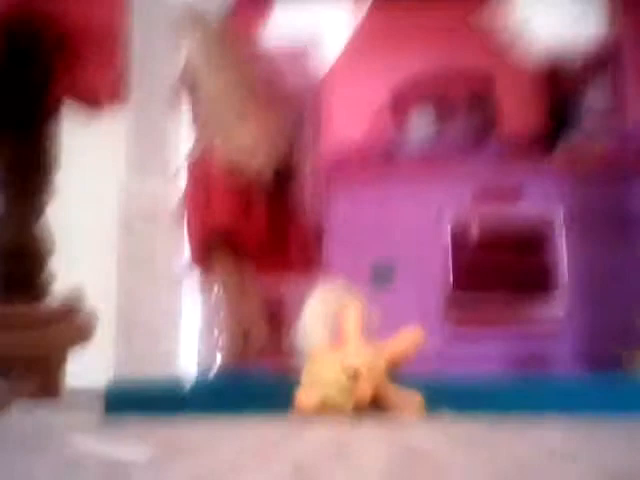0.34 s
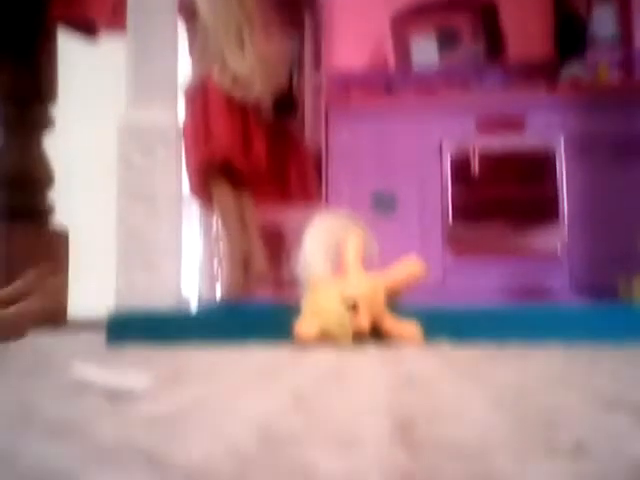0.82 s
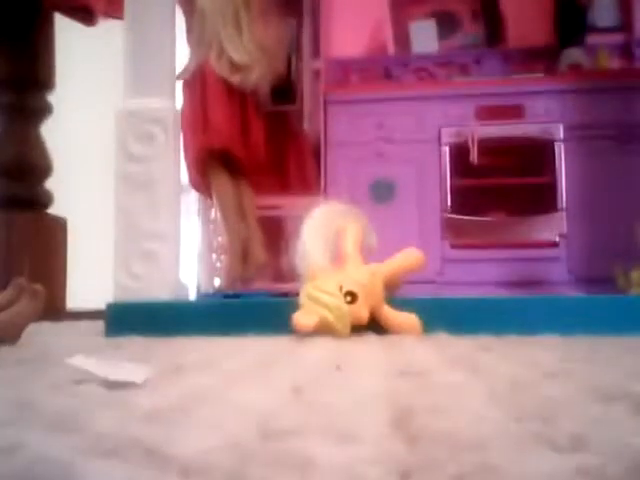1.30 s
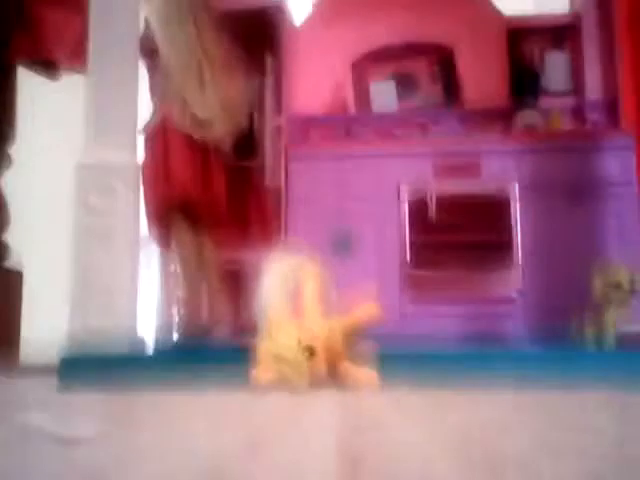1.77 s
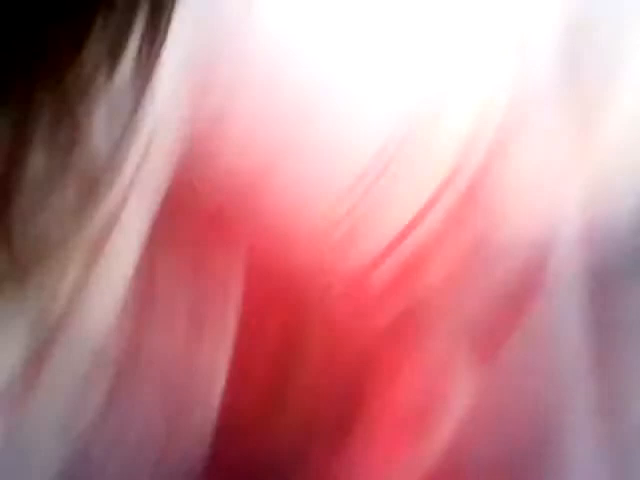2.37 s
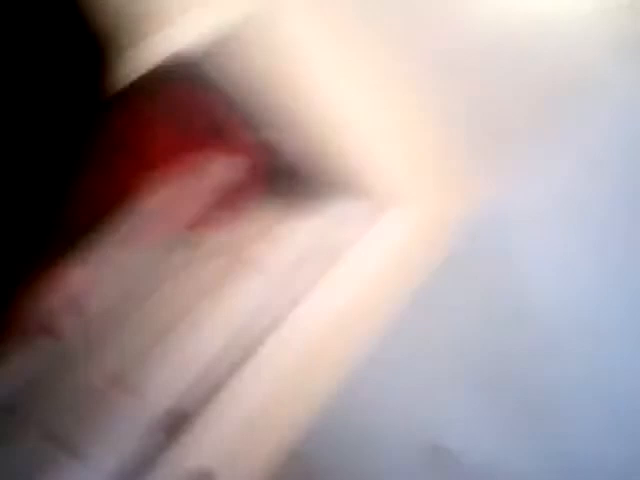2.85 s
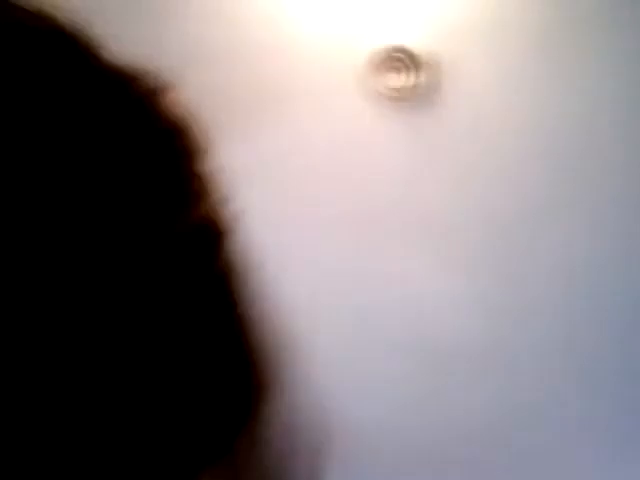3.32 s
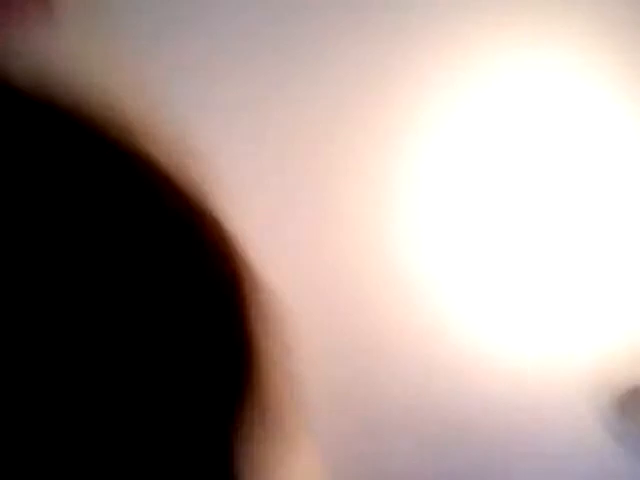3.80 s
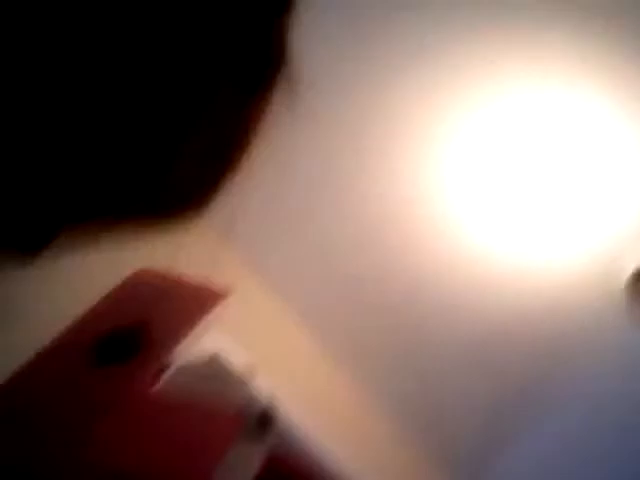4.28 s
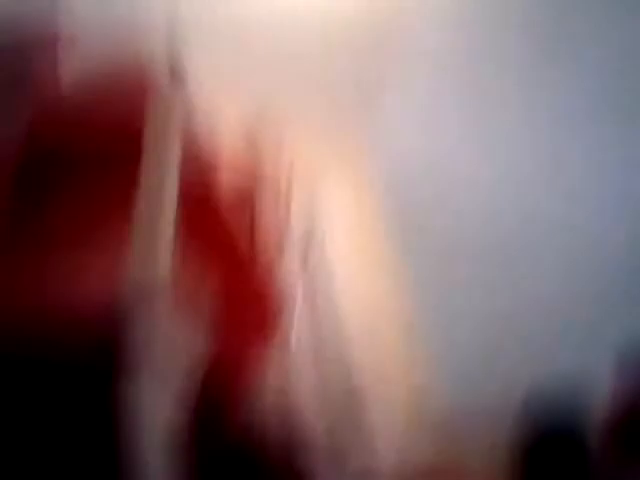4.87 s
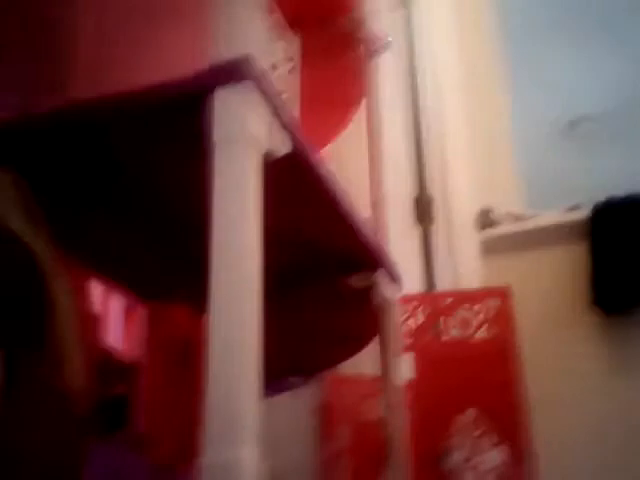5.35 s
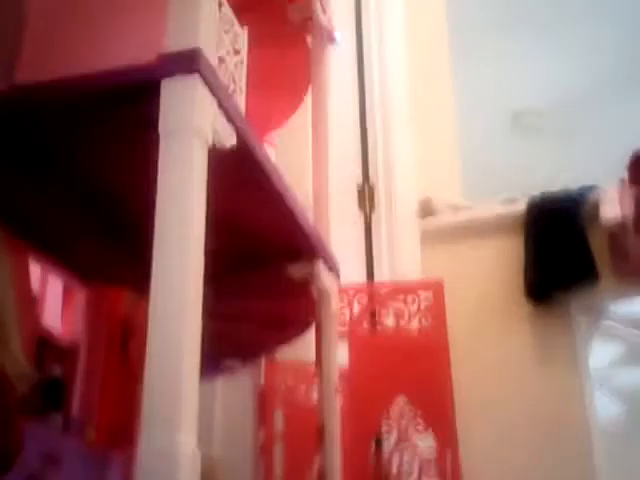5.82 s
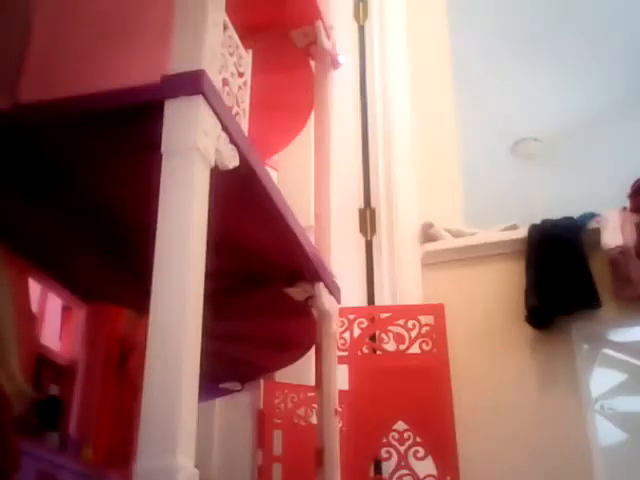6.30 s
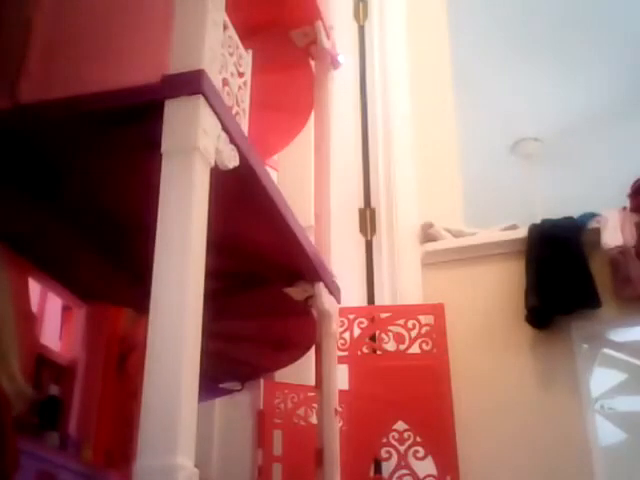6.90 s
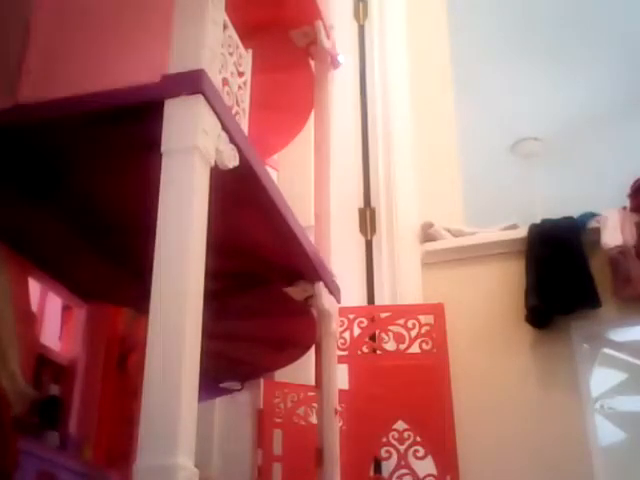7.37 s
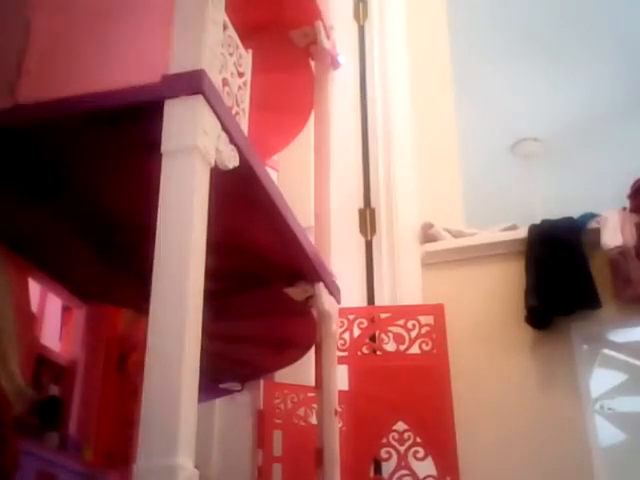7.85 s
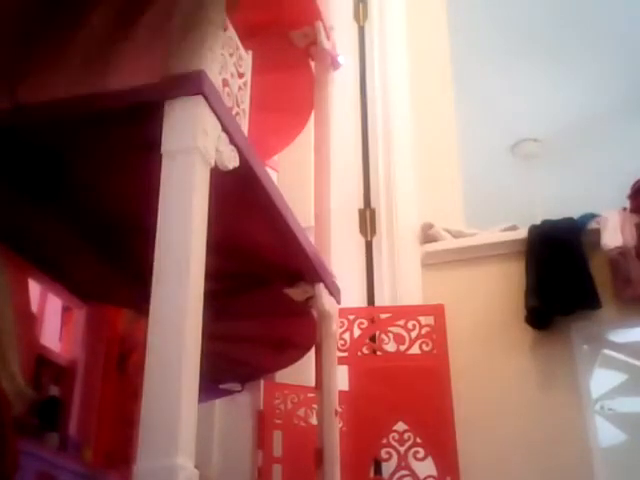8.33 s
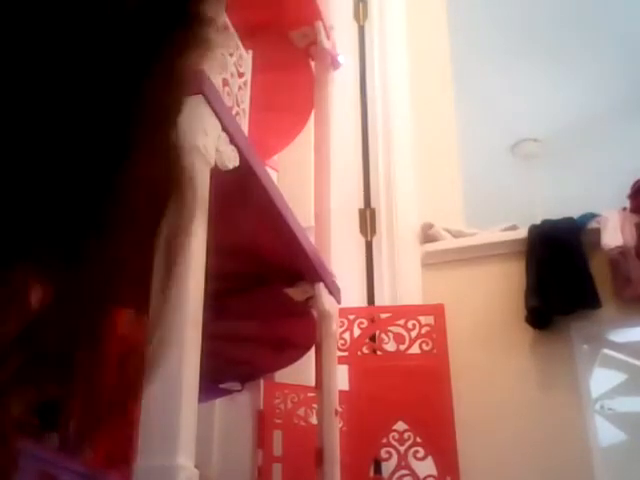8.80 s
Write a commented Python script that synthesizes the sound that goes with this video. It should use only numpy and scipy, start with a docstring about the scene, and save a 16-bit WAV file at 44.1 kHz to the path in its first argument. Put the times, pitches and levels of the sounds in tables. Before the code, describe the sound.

A small plastic camera is handled in a quiet bedroom, heard through its own case. Short hollow rubs come first, then a pause, then a cluster of knocks with a distorted bang at about two seconds. Uneven rubbing and light clicks follow, another harsh crack near six seconds, then mostly faint hiss with a few soft taps and brushes.

```python
"""Fingers and cloth drag over the plastic case of a small camera in a bedroom, right at its microphone:
stick-slip noise shaped into drag, scrape and hiss, plus resonant noises for the air pocket and skin swish.
Knocks thud (damped sines), ring the case modes and crack (noise bursts); the hardest overload the input.
The flexing case rumbles. A weak room tail, rumble, hiss and a thin whine lie underneath.
"""
import sys
import numpy as np
from scipy import signal
from scipy.fft import rfft, irfft, next_fast_len
from scipy.io import wavfile
from scipy.ndimage import map_coordinates

SR = 44100
rng = np.random.default_rng(int(sys.argv[2]) if len(sys.argv) > 2 else 0)


def dump_mix(stems):
    """Bounce the given channels to the path in sys.argv[1] as a 16-bit WAV at rate SR."""
    frames = np.atleast_2d(stems).T  # one column per channel
    limited = np.clip(frames, -1, 1)  # hard clip at full scale
    pcm = np.round(limited * 32767).astype(np.int16)
    wavfile.write(sys.argv[1], SR, pcm)


N = 402182
TIME = np.arange(N) / SR

# noise spectra, shape only: [f/Hz, relative density/dB]
FLOOR_SPECTRUM = [(15, -42.5), (25, -9), (91, 0), (151, -8), (482, -21.5), (1710, -30), (2980, -30),
                  (5770, -40.5), (6940, -31.5), (8580, -38), (10900, -32.5), (12700, -35.5), (13800, -21)]
RUMBLE_SPECTRUM = [(20, -5.5), (40, 1), (70, 5.5), (100, 3), (150, -6), (300, -43)]
CRACK_SPECTRUM = [(400, -11), (800, 9), (1300, 5), (2000, 5), (3000, 1.5), (4200, -3), (7000, -10.5),
                  (10000, -16), (14000, -13.5)]
DRAG_SPECTRUM = [(60, -11.5), (110, -4.5), (170, 0.5), (240, -1.5), (350, -5.5), (500, -3), (700, -17.5),
                 (1000, -37), (1800, -51.5)]
SCRAPE_SPECTRUM = [(400, -23), (750, 5), (1100, 2), (1600, -2), (2200, -3), (3000, -3), (3700, -10.5),
                   (4800, -16), (7000, -28)]
HISS_SPECTRUM = [(2500, -4.5), (4200, 2), (5200, 2), (6500, -0.5), (8500, -4.5), (11000, -2), (13700, -4.5),
                 (16000, -18)]
# case flexing under a firm grip: [t/s, rumble level/dB]
FLEX = [(0, -38), (.35, -56.5), (1.4, -46.5), (1.95, -50), (2.14, -34), (2.6, -55), (3.4, -53), (4, -49.5),
        (4.7, -51.5), (5.9, -45), (7.3, -57), (8.22, -43), (8.9, -46)]
# knocks and taps: [t/s, thud peak/dB, thud f/Hz, case ring level/dB, crack level/dB]
KNOCKS = [(0.0738, -28, 554, -42, -20), (0.086, -12.5, 420, -20.5, -3.5), (.14, -40, 420, -46, -16.5),
          (.181, -17.5, 135, -26, -48), (0.9173, -36, 180, -53, -27.5), (1.4922, -13, 102, -43, -27.5),
          (1.531, -7, 154, -18, -13), (1.585, -12, 93, -19.5, -9.5), (1.798, -17, 364, -29, -15),
          (1.847, -22, 221, -50, -44.5), (1.8939, -17.5, 193, -27.5, -20.5), (2.067, 6.5, 348, -4, 6.5),
          (2.1716, -25, 418, -33.5, -28), (2.2376, -19.5, 172, -32.5, -29.5),
          (2.3843, -4.5, 493.4, -16.5, -30), (2.4712, -19.5, 192, -36, -18), (2.626, -40, 205, -38, -19),
          (2.631, -38, 409, -37, -17), (2.674, -32, 420, -30.5, -21.5), (2.839, -15.5, 206, -50, -18.5),
          (3.1859, -25, 436, -27, -26), (3.261, -19, 431, -26.5, -21), (3.3136, -13, 330, -22, -16),
          (3.472, -47, 446, -31, -28), (3.6, -29, 395, -43, -42), (3.6772, -54, 253, -33, -29),
          (3.776, -26.5, 192, -31, -18), (4.034, -28.5, 179, -36, -24.5), (4.2912, -35.5, 528, -46, -28.5),
          (4.7687, -30.5, 374, -53.5, -34), (5.0093, -15.5, 221, -25, -13), (5.036, -20, 366, -35, -17),
          (5.067, -21.5, 94, -21, -17.5), (5.0798, -23, 172, -42, -16.5), (5.4347, -19, 193, -31, -19.5),
          (5.5661, -18.5, 157, -38.5, -13), (5.61, -16, 383, -31, -24), (5.621, -15, 227, -19.5, -13.5),
          (5.6422, -16, 650, -24.5, 4), (5.7282, 5, 176.3, 1.5, 12), (5.757, -11, 62, -18, -38),
          (5.895, -21.5, 174.2, -37, -25.5), (6.233, -33.5, 818, -51, -32),
          (8.1684, -17.5, 370, -37, -15.5), (8.4187, -32.5, 926, -44, -36.5)]
# one hop of a juddering fingertip: [thud peak/dB, thud f/Hz, case ring level/dB, crack level/dB]
HOP = (-18.5, 184, -44.5, -25)
# case modes, before detuning: [f/Hz, relative level/dB, t60/s]
CASE_MODES = [(202, -0.5, 0.039), (269, -0.5, 0.097), (381.6, 5, 0.054), (458, 3.5, 0.051),
              (588, -0.5, 0.075), (680, 3.5, 0.039), (783, 0, 0.045), (924, -3, 0.045), (1190, -1, 0.042),
              (1460, -7, .04)]
# air pocket between hand and microphone port: [t/s, lower resonance f/Hz, upper resonance f/Hz]
POCKET = [(.22, 430, 1700), (.38, 490, 1328), (.56, 510, 1426), (.72, 570, 1360), (.92, 630, 1120),
          (2.6, 540, 1106), (3.08, 270, 1400), (3.3, 430, 1080), (3.5, 480, 954.6), (3.8, 620, 1090),
          (4.4, 660, 1389), (8, 440, 860)]
# narrow swish of bare skin on smooth plastic: [t/s, centre f/Hz, level relative to scrape/dB]
SWISH = [(.13, 2250, 0.5), (.33, 2928, -1), (.46, 3110, -6), (.65, 2675, -9), (.9, 3150, -8),
         (1.55, 2980, -17), (2.05, 2900, 1), (2.4, 2990, -12), (2.55, 2952, 1), (2.68, 3062, -26),
         (3.3, 2900, -41), (3.6, 3220, -9.5), (4.5, 2922, -15.5), (5.55, 3000, -2.5), (5.88, 3100, -8.5),
         (6.02, 3400, -0.5), (7.2, 3661, -16)]
# strokes of fingers and cloth, levels at mid-stroke:
# [full contact t/s, length/s, drag level/dB, scrape level/dB, hiss level/dB, swell start to end/dB]
STROKES = [(0, 0.18, -35.5, -37.5, -52, 8), (0.194, 0.087, -27.5, -31, -42.5, 6.5),
           (0.301, 0.11, -27, -35.5, -51, -5), (0.408, 0.19, -26, -38, -53, 7),
           (0.608, 0.099, -33.5, -38.5, -63, -11), (0.717, 0.21, -33, -42, -57.5, -1),
           (1.01, 0.018, -60, -72, -72, -2), (1.393, 0.043, -39.5, -54, -62, -3),
           (1.493, 0.033, -44, -53, -49, -20), (1.556, 0.011, -36, -21, -41, 0.5),
           (1.602, .11, -43.5, -39.5, -43.5, -11), (1.739, 0.11, -41.5, -43.5, -46, -1),
           (1.895, 0.16, -40, -36, -40.5, 13), (2.072, 0.1, -39, -37.5, -37.5, -16.5),
           (2.232, 0.021, -50, -51, -57, -5), (2.324, .04, -52.5, -64.5, -67, 0),
           (2.396, 0.053, -33.5, -47, -59.5, -5), (2.496, 0.088, -45, -45.5, -55, 5.5),
           (2.645, 0.15, -34, -41.5, -51.5, 5), (2.812, 0.24, -34, -47.5, -55.5, -4),
           (3.033, 0.21, -31, -38, -52, 0), (3.264, 0.082, -25.5, -35, -59, -3),
           (3.372, 0.064, -39.5, -42, -54, 2), (3.475, 0.086, -35.5, -38.5, -58.5, -10),
           (3.609, 0.088, -41, -47.5, -59, -2.5), (3.753, 0.092, -42, -49.5, -56, 2.5),
           (3.906, 0.052, -39.5, -44.5, -53.5, 14), (3.972, 0.093, -44, -52.5, -61, 8),
           (4.299, 0.041, -43, -49, -61, -8.5), (4.36, 0.11, -50, -60, -71, 19),
           (4.545, 0.07, -45, -55, -61.5, -13), (4.779, 0.013, -47.5, -56, -57.5, 10),
           (4.898, 0.089, -47.5, -48.5, -57, 3), (5.017, 0.055, -33, -43, -44.5, 5.5),
           (5.266, 0.14, -45.5, -47, -46.5, 1.5), (5.422, 0.037, -34.5, -42, -45, -3),
           (5.469, 0.17, -40.5, -37.5, -39.5, 5), (5.651, .07, -41, -39.5, -36.5, -1),
           (5.76, 0.047, -35.5, -49, -58.5, 2), (5.847, 0.16, -41.5, -41, -48, 12),
           (6.025, 0.024, -50, -54, -59.5, 2.5), (7.192, 0.036, -45, -50.5, -58.5, 0.5),
           (7.602, 0.057, -45.5, -50.5, -58.5, -2), (7.877, .06, -44, -49, -56.5, 3.5),
           (8, 0.034, -46, -52.5, -56.5, -4), (8.122, 0.034, -47, -53, -62, 6),
           (8.169, 0.14, -43.5, -52.5, -59, -4.5), (8.434, 0.018, -47, -54.5, -57.5, -1.5),
           (8.633, 0.19, -44, -49.5, -63.5, 1), (8.851, 0.054, -42.5, -53, -63.5, -2)]
# hand hovering, barely touching: [t/s, drag level/dB]
HOVER = [(3.8, -81), (4.1, -67.5), (4.7, -68.5), (5.1, -88), (6.8, -84.5), (7.15, -66), (7.4, -66),
         (8.1, -61), (8.55, -66), (9.1, -67.5)]

FLOOR_DB, WHINE_HZ, WHINE_DB = -63, 10560, -87
ROOM_DB = -43   # room tail relative to the touch sounds
FIRM_DB = -46.5   # drag level that counts as a firm grip
WOBBLE_DB, WOBBLE_LIMIT_DB, WOBBLE_T60_S = -28.5, -2.5, .5   # level re thud; cap on thud level; decay
REBOUND_S, REBOUND_PITCH_SHARE = .009, .36
REBOUND_DB, REBOUND_GROWTH = -10.5, 1.4   # peak after a 0 dB thud; dB per dB of thud
HOPS_START_S, HOP_GAP_S, HOP_COUNT = 5.331, .0226, 4
SNAGS_PER_S, SNAG_DB, SNAG_SPREAD_DB = 30, -13.5, 2   # level relative to scrape
PRESS_DB_PER_S, LIFT_DB_PER_S = 649.5, 619.5
DRAG_SWELL_SHARE = .55   # drag answers less to speed than scrape
GRAZE_DB, GRAZE_DB_PER_S = -26.5, 140.5   # sleeve grazing the case around each stroke
HOVER_SCRAPE_DB, HOVER_HISS_DB = -4, -10   # relative to hover drag
SEALED_DB, SEAL_DULLNESS_DB, LEAK_SLOPE = -1, 18.5, 1.0   # pocket gain; drag minus hiss that seals; dB/dB
CUTOFF_HZ, CLIP_LEVEL = 14100, .68


def from_db(db):
    """Decibels to amplitude gain."""
    return 10 ** (np.asarray(db) / 20)


def rms_one(x):
    """Scale to unit rms."""
    return x / np.sqrt(np.mean(x ** 2) + 1e-20)


def in_time(rows):
    """Interpolate each column of a time table at every sample."""
    t_s, *columns = np.transpose(rows)
    return [np.interp(TIME, t_s, column) for column in columns]


def drift(knots_per_s):
    """Random piecewise-linear curve, unit rms."""
    knots = rng.standard_normal(8000)
    return rms_one(np.interp(TIME * knots_per_s, np.arange(len(knots)), knots))


def colour(x, spectrum):
    """Minimum-phase (causal) filter of unit power gain with the given spectrum."""
    size = next_fast_len(N + 8192, real=True)
    hz, db = np.transpose(spectrum)
    bins_hz = np.arange(size // 2 + 1) * SR / size
    gain = rms_one(from_db(np.interp(np.log(bins_hz + 1), np.log(hz), db)))
    # folding the cepstrum makes the phase minimum
    cepstrum = irfft(np.log(gain), size)
    cepstrum[1:size // 2] *= 2
    cepstrum[size // 2 + 1:] = 0
    return irfft(rfft(x, size) * np.exp(rfft(cepstrum)), size)[:N]


def resonate(hz, width_hz, block=256):
    """White noise twice through a two-pole resonance with a moving centre; unit rms."""
    out, state = rng.standard_normal(N), np.zeros((2, 2))
    radius = np.exp(-np.pi * width_hz / SR)
    for i in range(0, N, block):
        poles = [1, -2 * radius * np.cos(2 * np.pi * hz[i] / SR), radius ** 2]
        part = out[i:i + block]
        for k in range(2):
            part, state[k] = signal.lfilter([1, 0, -1], poles, part, zi=state[k])
        out[i:i + block] = part
    return rms_one(out)


def add(out, t_s, sound):
    """Mix a sound in at a time."""
    i = max(round(t_s * SR), 0)
    out[i:i + len(sound)] += sound[:N - i]


def background():
    """Room rumble and input hiss as shaped noise, plus a thin electronic whine as a sine."""
    whine = from_db(WHINE_DB) * np.sqrt(2) * np.sin(2 * np.pi * WHINE_HZ * TIME)
    return from_db(FLOOR_DB) * colour(rng.standard_normal(N), FLOOR_SPECTRUM) + whine


def bedroom(x, t60_s=0.28, low_hz=300, wall_hz=3000):
    """Dull tail of a furnished room: convolution with decaying band-limited noise of unit energy."""
    t = TIME[:SR // 2]
    tail = rng.standard_normal(len(t)) * from_db(-60 * t / t60_s) * (t > .008)
    tail = signal.sosfilt(signal.butter(1, [low_hz, wall_hz], "band", fs=SR, output="sos"), tail)
    return signal.fftconvolve(x, tail / np.sqrt(np.sum(tail ** 2)))[:N]


def grip(drag_db):
    """The case flexes and rumbles under the fingers, and wobbles on after each table knock."""
    flex_db, = in_time(FLEX)
    power = from_db(flex_db + np.minimum(drag_db - FIRM_DB, 0)) ** 2
    for t_s, peak_db, *_ in KNOCKS:
        start_db = min(peak_db, WOBBLE_LIMIT_DB) + WOBBLE_DB
        add(power, t_s, from_db(start_db - 60 * TIME[:SR] / WOBBLE_T60_S) ** 2)
    return np.sqrt(power) * colour(rng.standard_normal(N), RUMBLE_SPECTRUM)


def blows():
    """All knocks plus the even hops of a juddering fingertip, as knock rows."""
    return KNOCKS + [(HOPS_START_S + k * HOP_GAP_S, *HOP) for k in range(HOP_COUNT)]


def thuds(t60_cycles=3.55, contact_s=0.000068):
    """Each blow rocks the camera at its own pitch; it rocks back slower, and the hand damps it."""
    out, t = np.zeros(N), TIME[:SR // 4]
    pushes = [row[:3] for row in blows()]
    rebounds = [(t_s + REBOUND_S, REBOUND_DB + REBOUND_GROWTH * db, REBOUND_PITCH_SHARE * hz)
                for t_s, db, hz in pushes]
    for t_s, peak_db, hz in pushes + rebounds:
        decay = from_db(-60 * t * hz / t60_cycles)
        rock = np.sin(2 * np.pi * hz * t) * decay * (1 - np.exp(-t / contact_s))
        # pressure follows case speed: no net push
        pressure = np.gradient(rock * (1 - np.exp(-t * hz)))
        add(out, t_s, from_db(peak_db) * pressure / np.abs(pressure).max())
    return out


def case_ring(mode_spread_db=0.5, detune=0.064, contact_s=0.00028, soft_hz=600, soft_db=-32,
              db_per_octave=36):
    """Case modes ring after each blow, detuned at random; louder rings reach higher modes."""
    out, t = np.zeros(N), TIME[:SR // 4]
    hz, mode_db, t60_s = np.transpose(CASE_MODES)[:, :, None]
    for t_s, _, _, ring_db, _ in blows():
        strength, shift, phase = rng.standard_normal((3, len(CASE_MODES), 1))
        reach_hz = soft_hz * 2 ** ((ring_db - soft_db) / db_per_octave)
        gain = from_db(mode_db + mode_spread_db * strength) / np.sqrt(1 + (hz / reach_hz) ** 8)
        tones = np.sin(2 * np.pi * (hz * (1 + detune * shift) * t + phase))
        modes = gain * tones * from_db(-60 * t / t60_s)
        ring = modes.sum(0) * (1 - np.exp(-t / contact_s))
        add(out, t_s, from_db(ring_db) * ring / ring[:SR // 80].std())   # level over the first 12.5 ms
    return out


def cracks(t60_s=0.0095, rise_s=0.00052, tail_db=-27, tail_t60_s=0.099):
    """Hard plastic cracks at each blow: a short noise burst with a faint noise tail."""
    out, t = np.zeros(N), TIME[:SR // 8]
    decay = from_db(-60 * t / t60_s) + from_db(tail_db - 60 * t / tail_t60_s)
    envelope = decay * (1 - np.exp(-t / rise_s))
    for t_s, *_, crack_db in blows():
        add(out, t_s, from_db(crack_db) * envelope * rng.standard_normal(len(t)))
    return colour(out, CRACK_SPECTRUM)


def snags(scrape_db, decay_s=.0007):
    """Fibres and skin snag and snap: random decaying noise ticks that follow the scrape level."""
    sizes = from_db(SNAG_SPREAD_DB * np.minimum(rng.exponential(1, N), 2.5)) * rng.standard_normal(N)
    starts = rng.random(N) < SNAGS_PER_S / SR
    envelope = signal.lfilter([1], [1, -np.exp(-1 / (decay_s * SR))], starts + 1e-18)
    return from_db(scrape_db + SNAG_DB) * rms_one(colour(sizes * envelope, CRACK_SPECTRUM))


def stroke_levels(step=32):
    """Drag, scrape and hiss in dB: each stroke presses on, swells or fades with speed, and lifts off."""
    t = TIME[::step]
    hover_offsets_db = np.array([[0], [HOVER_SCRAPE_DB], [HOVER_HISS_DB]])
    power = from_db(np.interp(t, *np.transpose(HOVER)) + hover_offsets_db) ** 2
    for start_s, length_s, drag_db, scrape_db, hiss_db, swell_db in STROKES:
        before_s = np.maximum(start_s - t, 0)
        after_s = np.maximum(t - start_s - length_s, 0)
        press_db = -PRESS_DB_PER_S * before_s - LIFT_DB_PER_S * after_s
        graze_db = GRAZE_DB - GRAZE_DB_PER_S * (before_s + after_s)
        speed_db = swell_db * (np.clip((t - start_s) / length_s, 0, 1) - .5)
        levels_db = np.array([drag_db + DRAG_SWELL_SHARE * speed_db, scrape_db + speed_db, hiss_db + speed_db])
        power = power + from_db(np.maximum(press_db, graze_db) + levels_db) ** 2
    return [np.interp(TIME, t, 10 * np.log10(p)) for p in power]


def friction(slips_per_s, spread_db, grain, flutter_db):
    """Tiny stick-slip releases of uneven size over smooth sliding noise."""
    sizes = from_db(spread_db * np.minimum(rng.exponential(1, N), 4)) * rng.choice([-1, 1], N)
    slips = rms_one(sizes * (rng.random(N) < slips_per_s / SR))
    return rms_one((grain * slips + rng.standard_normal(N)) * from_db(flutter_db * drift(70)))


def rubbing(drag_db, scrape_db, hiss_db, slips_per_s=900, unsteady_db=1.85):
    """Shared slip noise makes drag and scrape; separate resonant noises add hollow pocket and swish."""
    lower_hz, upper_hz = in_time(POCKET)
    swish_hz, swish_db = in_time(SWISH)
    slips = friction(slips_per_s, spread_db=1.5, grain=0.79, flutter_db=1.9)
    # a flat hand (much drag, little hiss) seals the pocket; a fingertip leaves it open
    leak_db = LEAK_SLOPE * np.minimum(drag_db - hiss_db - SEAL_DULLNESS_DB, 0)
    pocket, slide = from_db(SEALED_DB + leak_db), from_db(swish_db)
    lower = pocket * resonate(lower_hz, width_hz=140)
    upper = 1.1 * pocket * resonate(upper_hz, width_hz=280)
    swish = slide * resonate(swish_hz, width_hz=850)
    catch = from_db(2.1 * drift(110))   # skin catches and lets go many times a second
    # divisors hold the level roughly steady as resonant noise joins in
    drag = (colour(slips, DRAG_SPECTRUM) + 0.68 * lower) / np.sqrt(1 + 1.3 * pocket ** 2)
    scrape = colour(slips, SCRAPE_SPECTRUM) + catch * (upper + swish)
    scrape = scrape / np.sqrt(1 + pocket ** 2 + slide ** 2)
    fibres = friction(slips_per_s=1500, spread_db=4.0, grain=0.86, flutter_db=-1.5)
    hiss = catch * colour(fibres, HISS_SPECTRUM)
    rub = from_db(drag_db) * drag + from_db(scrape_db) * scrape + from_db(hiss_db) * hiss
    return from_db(unsteady_db * drift(35)) * rub


def hand_reflections(x, gap_s=.0016, wander=.4, strength=0.26, moves_per_s=5.0, count=2):
    """Echoes off the nearby hand and sleeve comb the sound; the notches slide as they move."""
    out, samples = x.copy(), np.arange(N)
    for k in range(count):
        delay_s = gap_s * (k + 1) * np.exp(wander * np.tanh(drift(moves_per_s)))
        out -= strength * map_coordinates(x, [samples - delay_s * SR], order=1)
    return out / np.sqrt(1 + count * strength ** 2)


def scene():
    """Touch sounds reach the microphone through the case; little comes back from the room."""
    drag_db, scrape_db, hiss_db = stroke_levels()
    rub = hand_reflections(rubbing(drag_db, scrape_db, hiss_db))
    touch = rub + thuds() + case_ring() + cracks() + snags(scrape_db)
    return (touch + from_db(ROOM_DB) * bedroom(touch) + grip(drag_db) + background())[None]


def record(dry):
    """The microphone rounds off the top, the input clips flat on peaks, and the band is cut."""
    heard = signal.sosfilt(signal.butter(4, CUTOFF_HZ, fs=SR, output="sos"), dry)
    clipped = np.clip(heard, -CLIP_LEVEL, CLIP_LEVEL)
    return signal.fftconvolve(clipped, signal.firwin(201, CUTOFF_HZ, fs=SR)[None], "same")


dry = scene()
out = record(dry)
dump_mix(out)
```